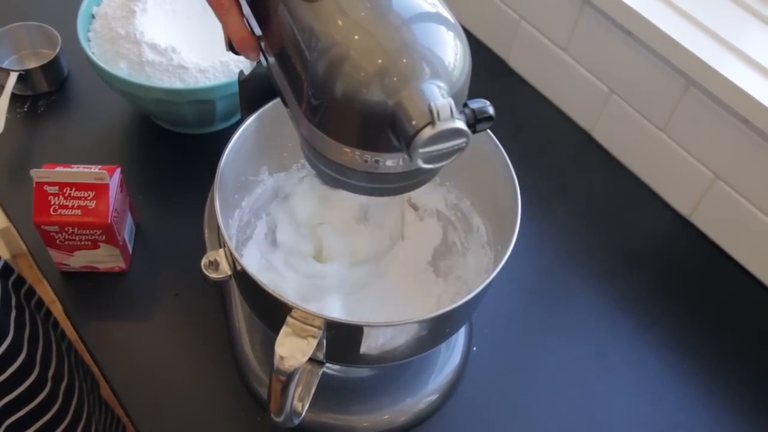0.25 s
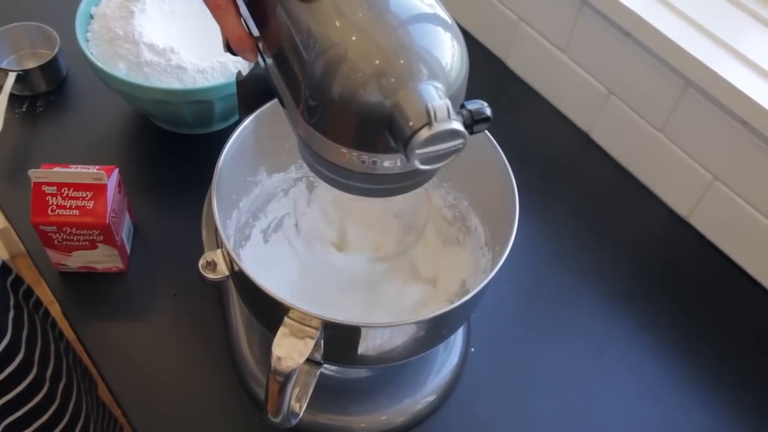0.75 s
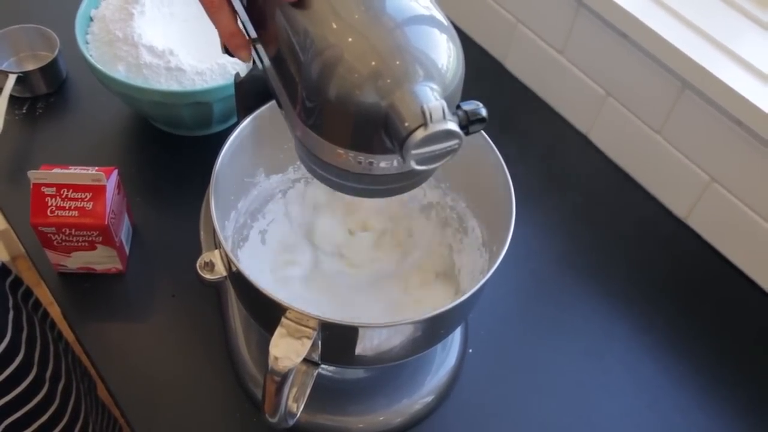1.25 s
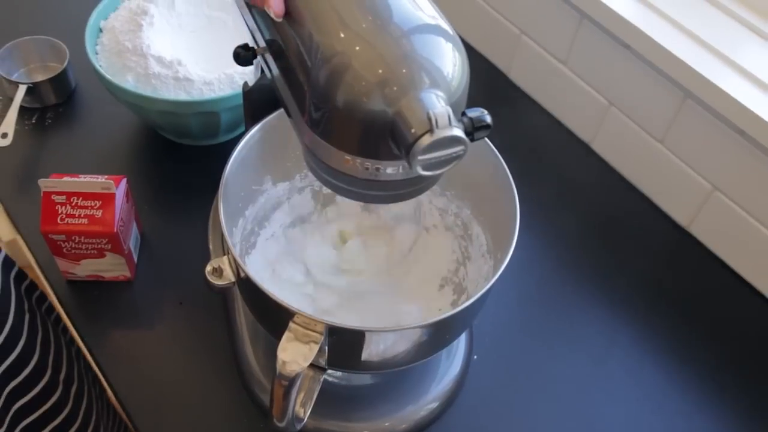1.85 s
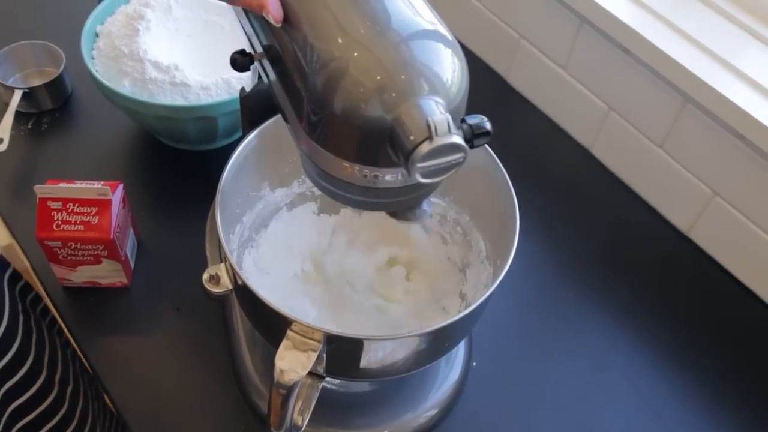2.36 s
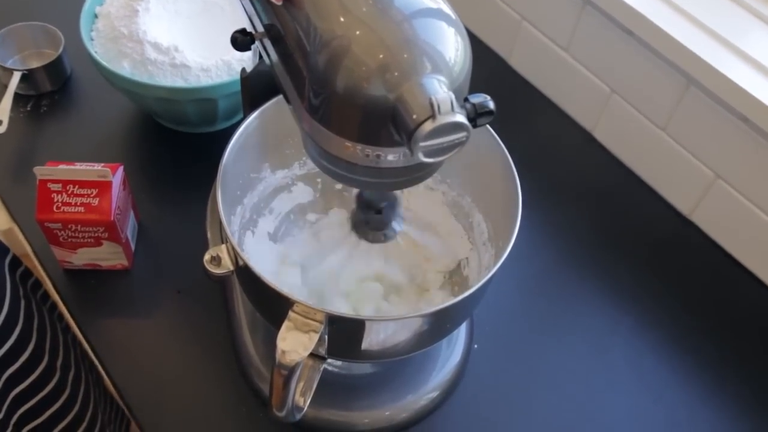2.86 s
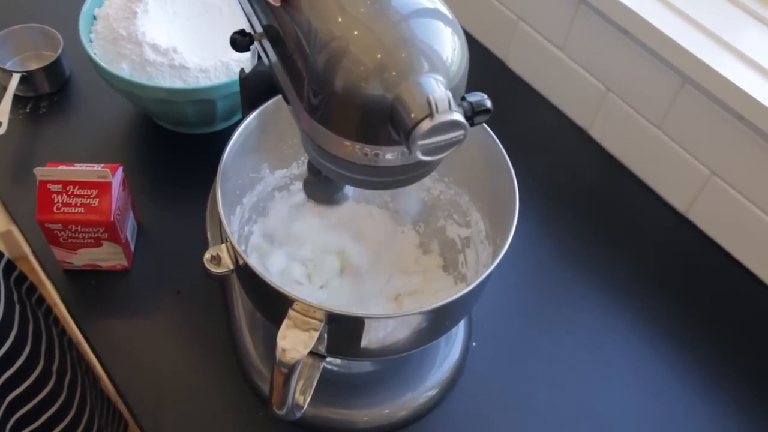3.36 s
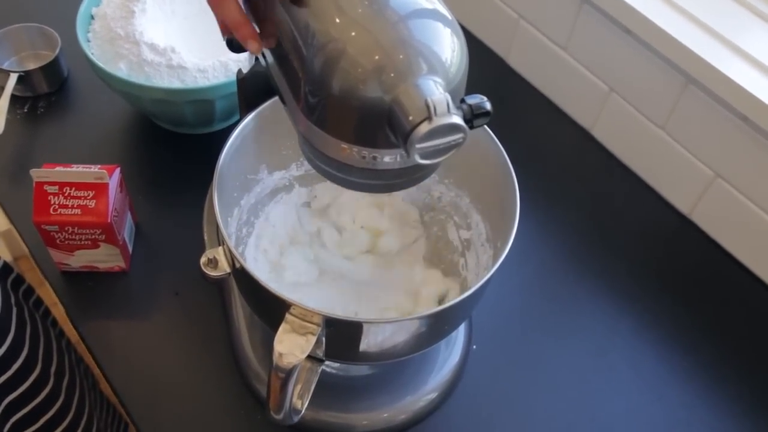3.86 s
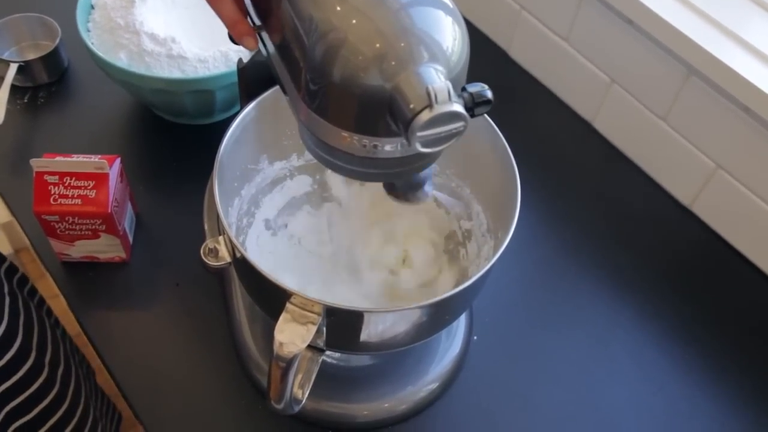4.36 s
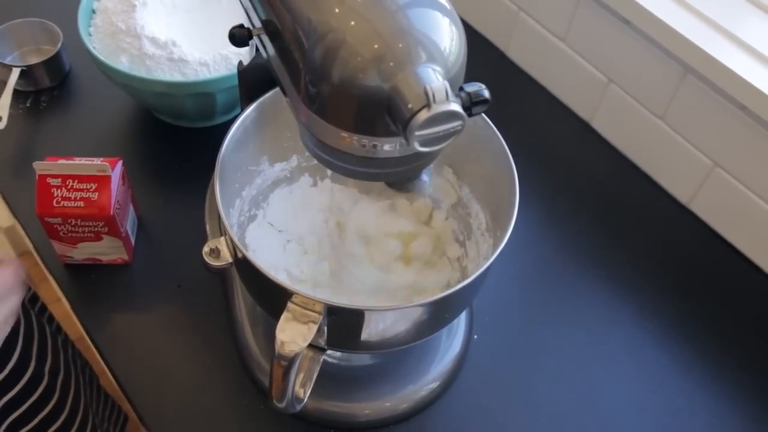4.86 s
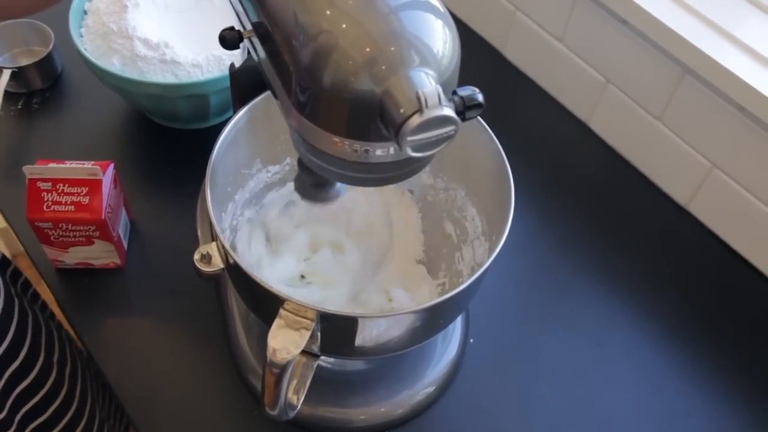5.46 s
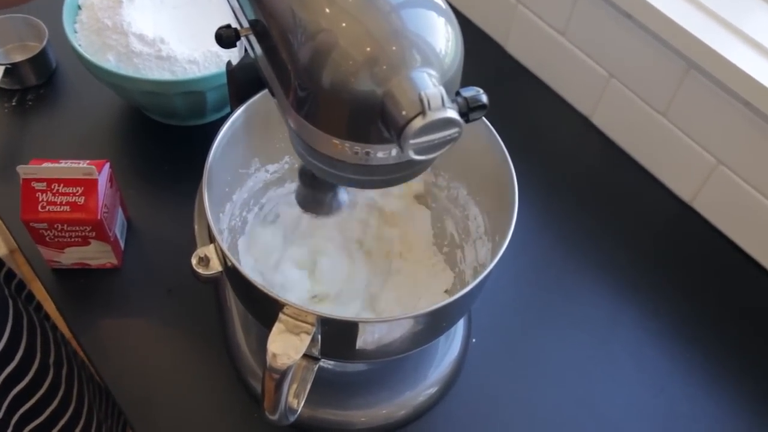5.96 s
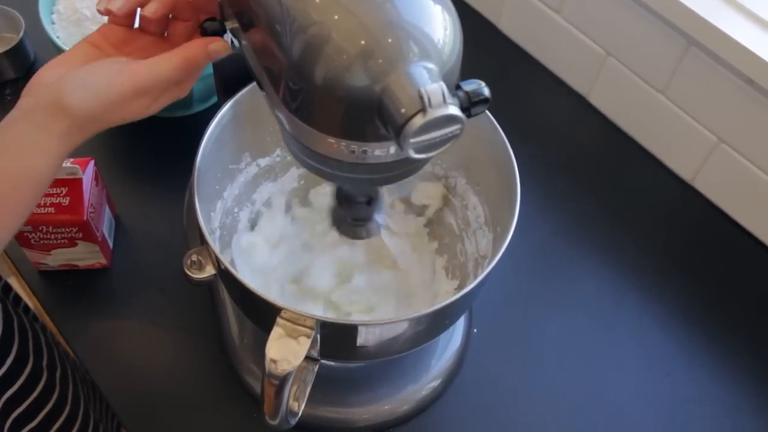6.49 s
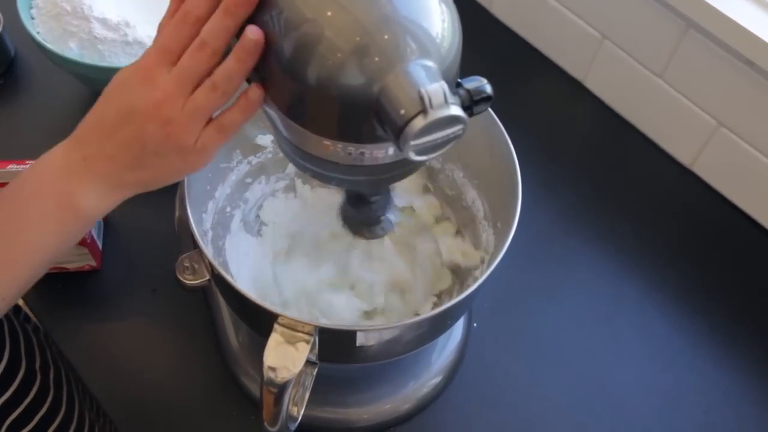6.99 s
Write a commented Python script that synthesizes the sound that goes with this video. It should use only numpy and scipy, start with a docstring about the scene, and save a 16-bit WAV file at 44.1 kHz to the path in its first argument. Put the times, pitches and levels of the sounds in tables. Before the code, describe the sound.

A stand mixer whisks cream in a steel bowl, close and in mono. From 0 to about 1.3 s a loud, dense growl dominates: a strong gear whine near 1 kHz with its octave, electric hum, gritty grinding, lumpy churning and faint low rumble of the stand, the pitch jolting slightly under uneven load. From 1.3 s it sinks, falling quickly after 2 s and gone by 2.6 s. A much quieter, lighter whirr near 2 kHz emerges, with airy motor rush and swishing wires; light whisk chatter flutters from 2.5 to 4.4 s, with small flicks at 3.3 and 3.7 s. At 4.3 s a brief surge lifts the motor rapidly to about 2.4 kHz. It holds there, slightly rough and wavering, its overtones slowly growing, with soft cream flicks on the bowl from 5 to 6.8 s, still running at the end around 7.2 s.

```python
"""Stand mixer whisking cream

Close to the microphone in a kitchen, a stand mixer whisks cream in a steel bowl, heard in one channel.
A loud, slow growl fades into a lighter whirr, which steps up in speed when the lever is pushed.
Gear and motor tones are cosines of the armature angle, throbbing once a shaft turn; the windings hum as sines.
Brushes, fan, churning cream, swishing wires and the rumbling stand are shaped noise."""
import sys
import numpy as np
from scipy import signal
from scipy.fft import rfft, irfft
from scipy.io import wavfile
from scipy.ndimage import uniform_filter1d, minimum_filter1d

SR = 44100
rng = np.random.default_rng(int(sys.argv[2]) if len(sys.argv) > 2 else 0)


def master_out(mix):
    """Clip the mix to full scale and print it as 16-bit PCM to the path in sys.argv[1]."""
    frames = np.transpose(np.atleast_2d(mix))
    ceiling = np.clip(frames, -1, 1)
    pcm = np.round(ceiling * 32767).astype(np.int16)
    wavfile.write(sys.argv[1], SR, pcm)


N = 318843
TIME = np.arange(N) / SR

# Stand rumbling on the counter, spectrum before levelling: pitch_hz, relative_level_db_per_hz
STAND_SPECTRUM = [(20, 2), (45, 1.5), (85, -7), (135, -4.5), (200, -14), (400, -28), (2000, -80)]
# Level of that rumble: time_s, level_db
STAND_LEVEL = [(0, -40.5), (.5, -52), (1.65, -44.5), (2.45, -61.5), (4.4, -58.5), (4.62, -72), (7.2, -63)]
# Hum of the windings, before fades and load: pitch_hz, growl_level_db, whirr_level_db
WINDING_HUM = [(234.6, -44.5, -74.5), (422, -42.5, -71), (479.2, -31.5, -59.5), (717, -48, -67.5),
               (842, -39, -59.5), (960.6, -36, -46.5)]
# Rush of brushes, fan and gears through the housing, before fades: pitch_hz, level_db_per_hz
GROWL_RUSH_SPECTRUM = [(20, -90), (185, -70), (260, -68), (420, -60.5), (570, -62.5), (700, -57),
                       (1300, -59.5), (2200, -59), (3500, -64.5), (9500, -63.5), (11200, -66), (13500, -79),
                       (16000, -80)]
WHIRR_RUSH_SPECTRUM = [(20, -102), (200, -91), (380, -87), (560, -79.5), (1250, -70.5), (1400, -72.5),
                       (2300, -74), (3600, -78.5), (5500, -78), (6800, -83), (10500, -76.5), (12400, -84),
                       (14600, -78), (16000, -85)]
# Resonances and hollows of housing and bowl: centre_hz, width_hz, lift_db
GROWL_RESONANCES = [(276, 50, 7.5), (800, 68, 6.5), (1806, 62, -18), (4720, 570, 8.5), (7400, 400, -7),
                    (7630, 610, 1), (8770, 250, 4.5), (9700, 300, 0), (10200, 180, -9)]
WHIRR_RESONANCES = [(569, 39, 5.5), (690, 39, -10), (794, 11, 8), (790, 25, 0.5), (944, 150, -3),
                    (1187, 215, -9.5), (1595, 135, 5), (1750, 150, -5), (2078, 30, 11.5), (3630, 140, -4),
                    (4156, 64, 7.5), (9200, 810, 5)]
# Whisk chattering on its shaft, before the whirr's fade: centre_s, level_db
CHATTER_BURSTS = [(2.55, -47), (2.71, -52), (2.795, -45), (2.96, -46), (3.131, -50), (3.321, -54),
                  (3.65, -49), (3.75, -49), (3.86, -46), (3.991, -44), (4.12, -43), (4.219, -63),
                  (4.36, -51)]
# Wires flicking cream at the bowl, before the bowl's resonances: start_s, level_db
CREAM_FLICKS = [(3.293, -2), (3.738, -14), (5.017, -6), (5.085, -9), (5.296, -11), (5.396, -5), (5.779, -8),
                (6.045, -3), (6.23, -6), (6.445, -8), (6.699, -8), (6.788, -7)]
# Brief wavers of the motor speed, with dips of the gear note: centre_s, half_length_s, speed_change_percent,
# gear_note_dip_db
SPEED_WAVERS = [(0.087, 0.031, -1.28, 5.5), (0.29, .03, -0.24, -0.5), (0.691, 0.017, -0.92, 9.5),
                (0.813, 0.044, -0.12, 6), (1.104, 0.043, -0.187, 19), (1.71, 0.033, -0.43, 10),
                (1.977, 0.059, -0.349, 2), (2.237, 0.0271, -0.62, 0.5), (2.414, 0.031, -0.56, 2),
                (2.662, 0.051, -0.37, 0), (2.905, 0.023, -0.48, 5), (3.097, 0.036, -0.5, 0.5),
                (3.434, 0.023, -0.79, 6.5), (3.711, 0.026, -0.48, 4), (3.906, .025, -0.45, -1),
                (4.068, 0.016, -0.72, 12), (4.358, 0.053, -0.39, 1), (4.625, 0.031, 0.13, 7),
                (4.858, 0.0408, 0.485, 7), (5.368, 0.054, 0.54, 3.5), (5.606, 0.02, 0.55, 4),
                (5.769, 0.013, -0.26, 6), (6.035, 0.048, 0.59, 4), (6.489, 0.024, -0.72, 0),
                (6.558, .03, 0.61, 2), (6.751, .04, -0.87, 2), (6.986, 0.038, 0.23, 6),
                (7.207, 0.038, -0.8, 2)]
# Motor overtones at each setting, before rises and fades.
# Multiple of the armature rate: level_db, throb (exponent of the swell per shaft turn, no unit)
SLOW_OVERTONES = {4: (-42.5, 0.18), 8: (-38.5, .3), 11: (-37, .2), 12: (-44, 0.14), 16: (-41, 0.18),
                  24: (-33.5, 0.03), 30: (-37, 0.22), 39: (-37, 0.17), 40: (-32, 0.14), 47: (-32.5, 0.19),
                  48: (-28, 0.034), 50: (-26.5, 0.39), 60: (-38.5, 0.27), 65: (-42, .2), 72: (-36.5, 0.17),
                  74: (-36.5, 0.1), 85: (-38, 0.18), 96: (-37.5, .3)}
MEDIUM_OVERTONES = {8: (-57, .2), 11: (-54.5, .2), 16: (-54.5, 0.13), 20: (-38.5, 0.14), 23: (-53, 0.17),
                    24: (-52.5, 0.19), 30: (-55, .1), 36: (-58, 0.18), 40: (-49, 0.25), 47: (-62, 0.33),
                    48: (-44.5, 0.48), 50: (-41, .45), 60: (-53, .3), 65: (-58, .2), 72: (-56, .2),
                    74: (-55, .2)}
FAST_OVERTONES = {7: (-47, 0.27), 8: (-58, .2), 9: (-54, 0.18), 11: (-49, 0.16), 13: (-48, 0.16),
                  14: (-53, 0.22), 20: (-35.5, 0.56), 23: (-54, 0.12), 24: (-48.5, 0.073),
                  30: (-45.5, 0.39), 33: (-52.5, .2), 37: (-53.5, 0.46), 39: (-44, 0.44), 40: (-35, 0.39),
                  42: (-43, 0.5), 47: (-56, .3), 48: (-47.5, .3), 50: (-60, .2), 55: (-62, 0.23),
                  61: (-55, 0.17), 63: (-57, .2)}
# Octave of the slow gear note, before the growl's fade: time_s, level_db
SLOW_OCTAVE = [(0, -20.5), (.26, -20.5), (.36, -23.5), (1.15, -24.5), (1.38, -15.5), (1.55, -26),
               (1.68, -16.5), (2, -29)]
# Whirr's own gear note taking over the pitch of that octave: time_s, share_0_to_1
NOTE_HANDOVER = [(1.85, 0), (2.03, 0.5), (2.9, 0.89)]
# Growl dying away: time_s, level_db
GROWL_LEVEL = [(0, 1.5), (.6, 1.5), (1.3, 0), (1.6, -3), (1.9, -5), (2.2, -10.5), (2.4, -17), (2.5, -24.5),
               (2.6, -70)]
# Whirr emerging, all but its gear note: time_s, level_db
WHIRR_LEVEL = [(0, -37), (1.2, -3.5), (1.8, -0.5), (4.3, -0.5), (4.7, -0.5), (7.2, 0.5)]

TEETH, GEAR_RATIO = 10, 6  # GEAR_RATIO is armature turns per shaft turn
SLOW_HZ, MEDIUM_HZ, FAST_HZ = 1006, 2009.7, 2371  # gear mesh rate at each setting, before drift and wavers
SLOW_DB, MEDIUM_DB, FAST_DB = -12.5, -25.5, -32.5  # gear note at each setting, before dips and fades
LEVER_S, SPIN_UP_S = 4.32, 0.04  # the lever moves a notch; the motor takes this long to follow
HUNT_SHARE, HUNT_RATE = 0.001388, 13  # the governor's drift: share of the speed, changes a second
ORBIT_TURNS = 60  # armature turns per trip of the whisk round the bowl
ORBIT_SAG, ORBIT_LAG_RAD = 0.00075, 0.97  # share of the speed lost on one side of the bowl, and where
MEDIUM_RISE_DB_PER_S, FAST_RISE_DB_PER_S = 0.1, 0.64  # slow growth of the overtones
GRIND_DIP = 0.049  # share of each gear note dip, in dB, that the rest of the growl follows
HUM_DB, HUM_FAST_DB = 0, 1.5  # trim of the whirr's hum, and its rise at the fast setting
SURGE_DB, SURGE_LAG_S, SURGE_S = 10, 0.049, 0.017  # current surge after the lever: height, delay, half length
CHATTER_S = 0.04  # half length of a chatter burst
CHURN_DB, CHURN_LUMP_DB, CHURN_RATE = -31.5, 5, 45  # churning cream: level, lumpiness, lumps a second
LURCH_DB, LURCH_RATE = 5, 17  # unevenness of the stand's rumble, and changes a second
TOP_HZ = 15700  # upper edge of the sound


def undb(db):
    """Decibels to gain."""
    return 10 ** (np.asarray(db) / 20)


def curve(rows, axis=1):
    """One column of a table, joined by straight lines in time."""
    rows = np.asarray(rows, float)
    return np.interp(TIME, rows[:, 0], rows[:, axis])


def walk(rate):
    """Smooth chance with about `rate` new values a second and a spread near 1."""
    values = rng.standard_normal(4096)
    return np.sqrt(3 / 2) * np.interp(TIME * rate, np.arange(len(values)), values)


def bell(centre, half):
    """A smooth swell of height 1 around a moment."""
    return np.exp(-((TIME - centre) / half) ** 2)


def colour(x, spectrum, body):
    """Give unit white noise a spectrum in dB per Hz, lifted at the resonances."""
    hz = np.maximum(np.fft.rfftfreq(N, 1 / SR), 1)
    points, db = np.transpose(spectrum)
    db = np.interp(np.log(hz), np.log(points), db)
    for centre, width, lift in body:
        db = db + lift / (1 + (2 * (hz - centre) / width) ** 4)
    return irfft(rfft(x) * undb(db), N) * np.sqrt(SR / 2)


def ring(x, hz, width):
    """One resonance with gain 1 at its centre."""
    return signal.lfilter(*signal.iirpeak(hz, hz / width, fs=SR), x)


def shake():
    """The stand rocks on the counter with an uneven low rumble."""
    lurching = undb(LURCH_DB * walk(LURCH_RATE))
    rumble = colour(rng.standard_normal(N) * lurching, STAND_SPECTRUM, [])
    return undb(curve(STAND_LEVEL)) * rumble / rumble.std()


def hum(axis, waver_db):
    """The windings buzz at steady pitches near mains harmonics, each wavering in level at random."""
    out = np.zeros(N)
    for row in WINDING_HUM:
        level = undb(row[axis] + waver_db * walk(12))
        out += np.sqrt(2) * level * np.sin(2 * np.pi * (row[0] * TIME + rng.random()))
    return out


def wear(angle, count, size=16384):
    """Random roughness of the gear wheel, traced again on every shaft turn; rms near 1."""
    track = irfft(np.r_[0, np.exp(2j * np.pi * rng.random(count))], size)
    place = (angle / GEAR_RATIO / (2 * np.pi) % 1) * size
    return np.interp(place, np.arange(size), track / track.std())


def rush(angle, buzz, throb, flicker_db, worn, count):
    """Hiss and gear roughness of rms 1, pulsing with each armature turn and each shaft turn."""
    pulse = np.exp(buzz * np.cos(angle) + throb * np.cos(angle / GEAR_RATIO))
    gate = pulse * undb(flicker_db * walk(70))
    noise = gate * (rng.standard_normal(N) + worn * wear(angle, count))
    return noise / noise.std()


def churn():
    """Lumps of cream thud around the bowl and stir its hollow resonance."""
    lumps = undb(CHURN_LUMP_DB * walk(CHURN_RATE)) * rng.standard_normal(N)
    lumps = ring(ring(lumps, hz=800, width=120), hz=784, width=230)
    return undb(CHURN_DB) * lumps / lumps.std()


def whisk(angle, step_up):
    """Wires swish through the cream in step with the shaft, chatter, and flick cream at the damped bowl."""
    strokes = undb(4.2 * walk(70) + walk(8) + 1.1 * np.cos(angle / GEAR_RATIO))
    swish = ring(ring(strokes * rng.standard_normal(N), hz=1660, width=190), hz=1580, width=260)
    chatter = ring(ring(strokes * rng.standard_normal(N), hz=3220, width=130), hz=3180, width=400)
    chatter_gain = sum(undb(db) * bell(centre, CHATTER_S) for centre, db in CHATTER_BURSTS)
    chatter = chatter_gain * chatter / chatter.std()
    bursts = np.zeros(N)
    for start, db in CREAM_FLICKS:
        age = np.maximum(TIME - start, 0)
        bursts += undb(db) * (age > 0) * np.exp(-age / 0.0036)
    flicks = ring(ring(bursts * rng.standard_normal(N), hz=1580, width=120), hz=1600, width=830)
    return undb(-46.0 + 2.6 * step_up) * swish / swish.std() + chatter + flicks


def wavers():
    """The motor speed wavers briefly and the gear note dips: speed factor, and dip of the gear note in dB
    (negative lifts it)."""
    speed, dip_db = np.ones(N), np.zeros(N)
    for centre, half, percent, db in SPEED_WAVERS:
        shape = bell(centre, half)
        speed += shape * percent / 100
        dip_db += shape * db
    return speed, dip_db


def governed(set_hz):
    """Mesh rate around its setting: it drifts, and sags once on each trip of the whisk round the bowl."""
    orbit = 2 * np.pi * np.cumsum(set_hz) / (TEETH * ORBIT_TURNS * SR)
    sag = ORBIT_SAG * np.cos(orbit - ORBIT_LAG_RAD)
    return set_hz * (1 + HUNT_SHARE * walk(HUNT_RATE) - sag)


def armature(mesh_hz, jitter, jitter_rate, runout):
    """Angle of the armature: the governor hunts, and the gear drags once a shaft turn."""
    turns_per_s = mesh_hz / TEETH * (1 + jitter * walk(jitter_rate))
    angle = 2 * np.pi * np.cumsum(turns_per_s) / SR
    return angle - runout * np.sin(angle / GEAR_RATIO)


def partial(angle, order, throb, rough, flutter_rate, spread=0.13):
    """One motor order of rms 1: it swells once a shaft turn and flutters with the play between the teeth."""
    swell = np.exp(throb * np.cos(angle / GEAR_RATIO - spread * order))  # the peak's place depends on the order
    phase = order * angle + rng.uniform(0, 2 * np.pi) + 1.14 * rough * walk(flutter_rate)
    flutter = 1 + 1.07 * rough * walk(flutter_rate)
    tone = swell * flutter * np.cos(phase)
    return tone / tone.std()


def overtones(angle, orders, rough, flutter_rate, sway):
    """Motor orders, the higher more smeared; multiples of the gear mesh sway in pitch once a shaft turn."""
    out = np.zeros(N)
    mesh = angle + sway * np.sin(angle / GEAR_RATIO)
    for order, (db, throb) in orders.items():
        smear = np.sqrt(order / (2 * TEETH))
        source = angle if order % TEETH else mesh
        out += undb(db) * partial(source, order, throb, rough * smear, flutter_rate * smear)
    return out


def growl(speed, dip_db):
    """The slow setting: a strong gear note and its octave over heavy hum, grinding and churning."""
    angle = armature(governed(SLOW_HZ * speed), jitter=0.00053, jitter_rate=45, runout=0.008)
    note_gain = undb(SLOW_DB - dip_db + 0.5 * walk(31))
    note = note_gain * partial(angle, order=TEETH, throb=0.09, rough=0.071, flutter_rate=60)
    octave = partial(angle, order=2 * TEETH, throb=0.21, rough=0.44, flutter_rate=55)
    yielding = np.sqrt(np.clip(1 - curve(NOTE_HANDOVER) ** 2, 0, 1))  # equal-power handover to the whirr
    octave = undb(curve(SLOW_OCTAVE)) * octave * yielding
    grind = rush(angle, buzz=0.11, throb=0.04, flicker_db=0.0, worn=0.77, count=960)
    grind = colour(grind, GROWL_RUSH_SPECTRUM, GROWL_RESONANCES)
    upper = overtones(angle, SLOW_OVERTONES, rough=0.31, flutter_rate=60, sway=-0.0083)
    rest = undb(-GRIND_DIP * dip_db) * (upper + hum(axis=1, waver_db=2.25) + grind + churn())
    return undb(curve(GROWL_LEVEL)) * (note + octave + rest)


def whirr(speed, dip_db, step_up):
    """The medium setting, gliding to the fast one as the lever moves a notch."""
    set_hz = MEDIUM_HZ + (FAST_HZ - MEDIUM_HZ) * step_up
    angle = armature(governed(set_hz * speed), jitter=0.0015, jitter_rate=45, runout=0.03)
    strain = np.sin(np.pi * step_up)  # the teeth knock about while the motor accelerates
    rough = 0.13 + 0.082 * step_up + 0.5 * strain
    note = partial(angle, order=TEETH, throb=0.077, rough=rough, flutter_rate=80)
    note_db = MEDIUM_DB + (FAST_DB - MEDIUM_DB) * step_up - dip_db
    note = note * curve(NOTE_HANDOVER) * undb(note_db)

    since_lever = TIME - LEVER_S
    medium = overtones(angle, MEDIUM_OVERTONES, rough=0.38, flutter_rate=170, sway=0.0029)
    medium = undb(MEDIUM_RISE_DB_PER_S * since_lever + 1.6) * medium
    fast = overtones(angle, FAST_OVERTONES, rough=0.38, flutter_rate=150, sway=0.0035)
    fast = undb(FAST_RISE_DB_PER_S * since_lever - 2.14) * fast

    air = rush(angle, buzz=0.25, throb=0.034, flicker_db=-0.2, worn=0.67, count=480)
    air = undb(-0.5 + 1.67 * step_up) * colour(air, WHIRR_RUSH_SPECTRUM, WHIRR_RESONANCES)
    current_db = HUM_DB + HUM_FAST_DB * step_up + SURGE_DB * bell(LEVER_S + SURGE_LAG_S, SURGE_S)
    windings = undb(current_db) * hum(axis=2, waver_db=1.6)
    rest = (1 - step_up) * medium + step_up * fast + air + windings + whisk(angle, step_up)
    return note + undb(curve(WHIRR_LEVEL)) * rest


def scene():
    """The mixer, heard in one channel."""
    speed, dip_db = wavers()
    step_up = np.clip((TIME - LEVER_S) / SPIN_UP_S, 0, 1)
    return (growl(speed, dip_db) + whirr(speed, dip_db, step_up) + shake())[None]


def record(dry):
    """A fast limiter holds the peaks, then a steep low-pass cuts the top."""
    top = signal.ellip(10, 0.1, 80, TOP_HZ, fs=SR, output="sos")
    headroom = np.minimum(1, undb(-5.7) / (np.abs(dry) + 1e-9))
    gain = uniform_filter1d(minimum_filter1d(headroom, size=61), size=61)  # hold, then smooth, in samples
    return signal.sosfilt(top, dry * gain)


dry = scene()
out = record(dry)
master_out(out)
```